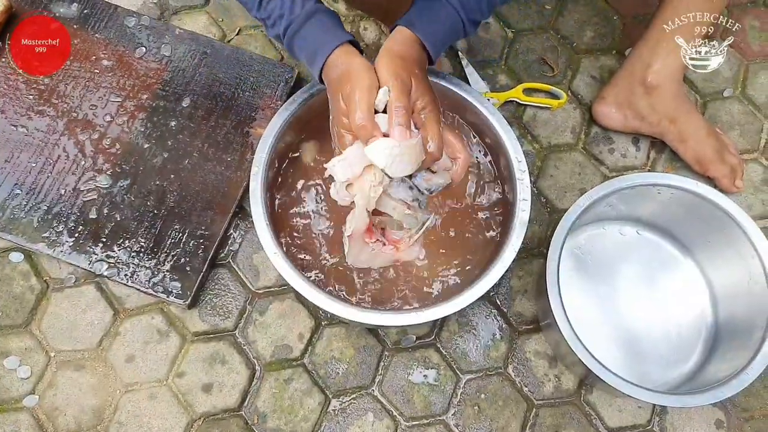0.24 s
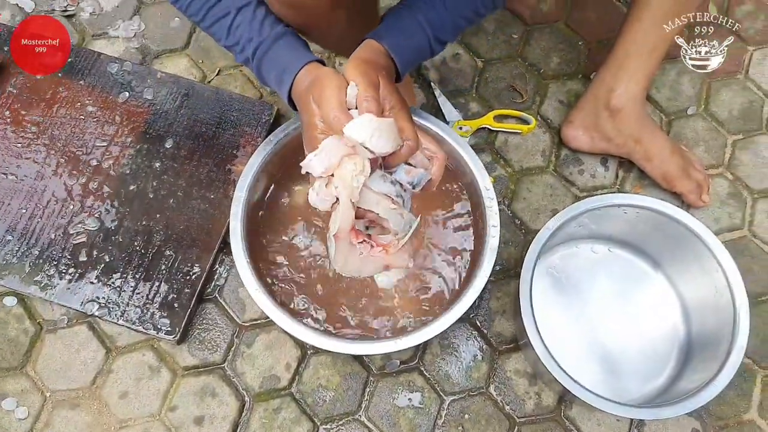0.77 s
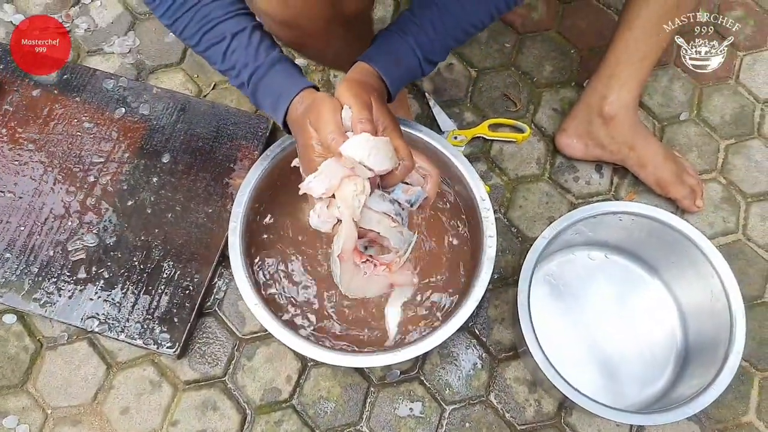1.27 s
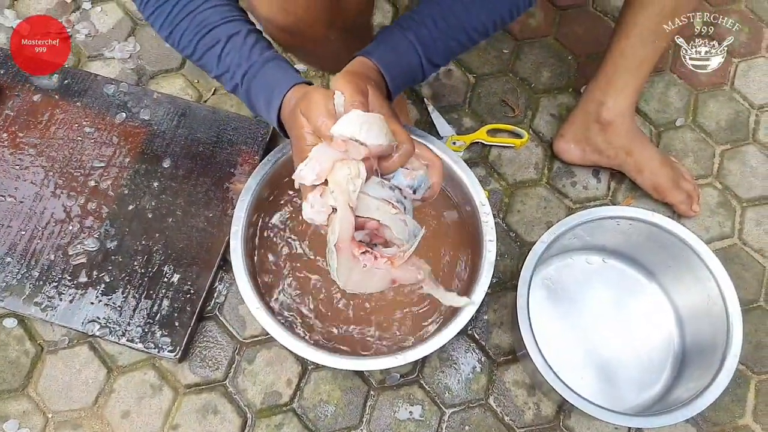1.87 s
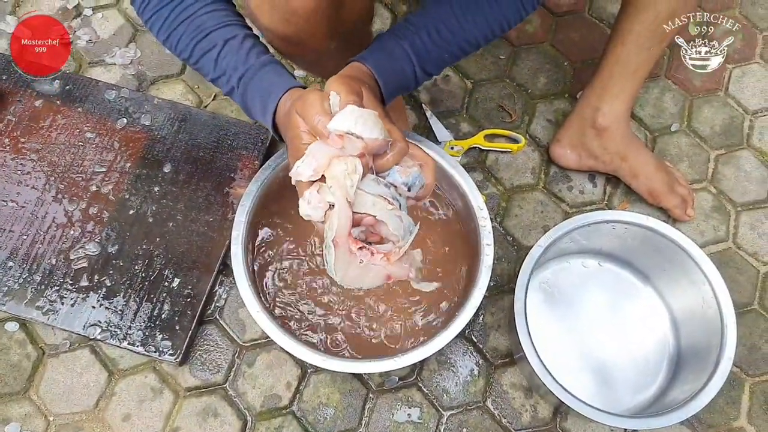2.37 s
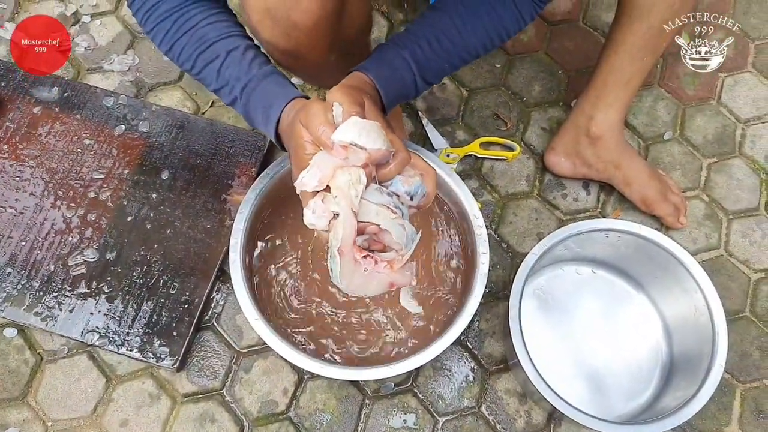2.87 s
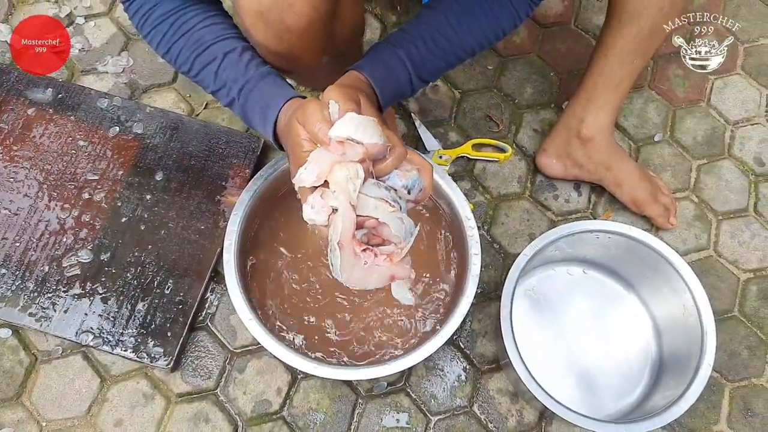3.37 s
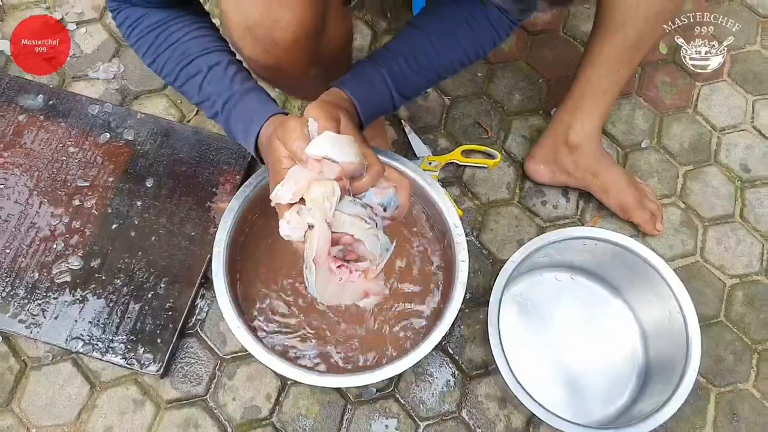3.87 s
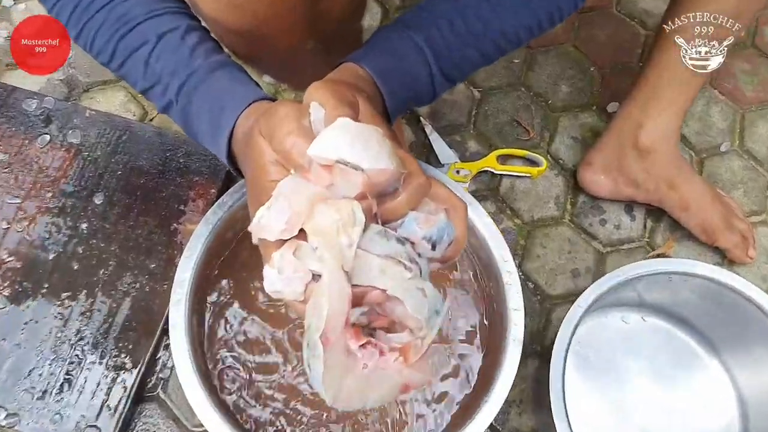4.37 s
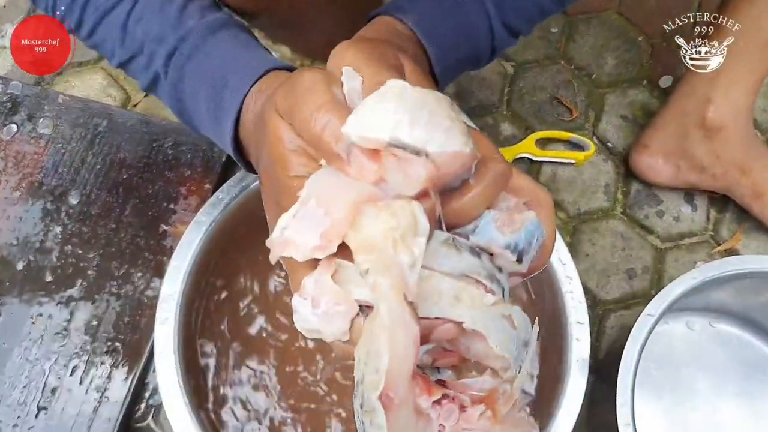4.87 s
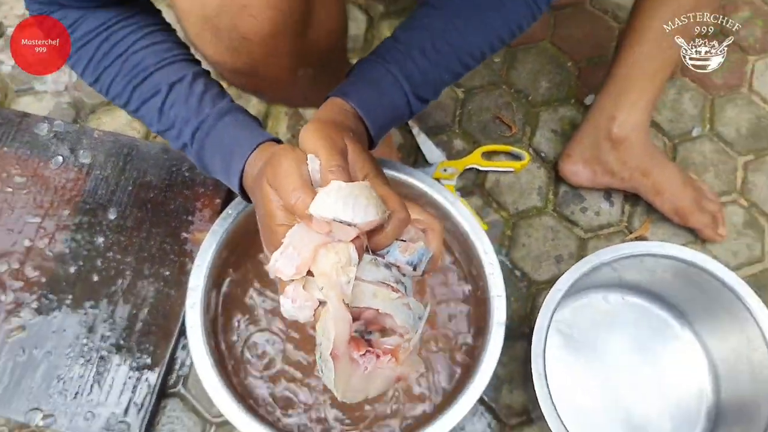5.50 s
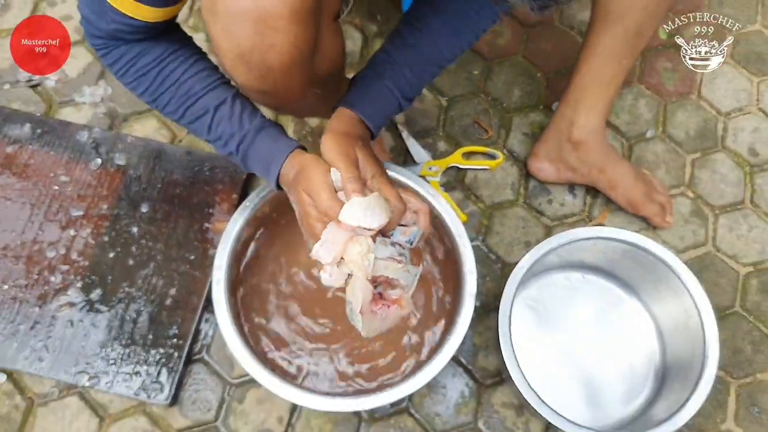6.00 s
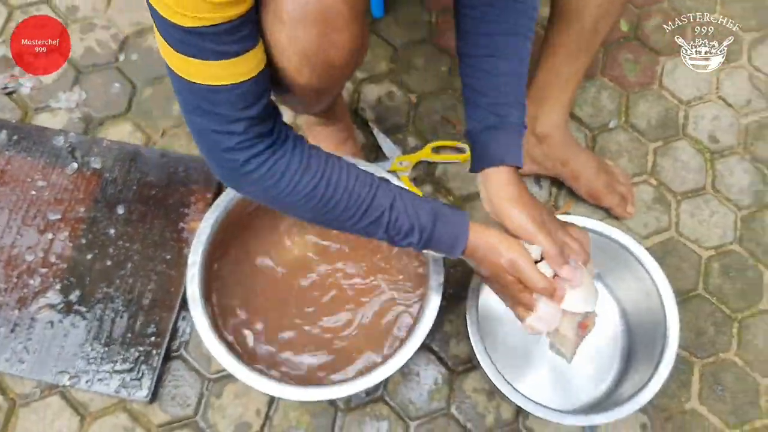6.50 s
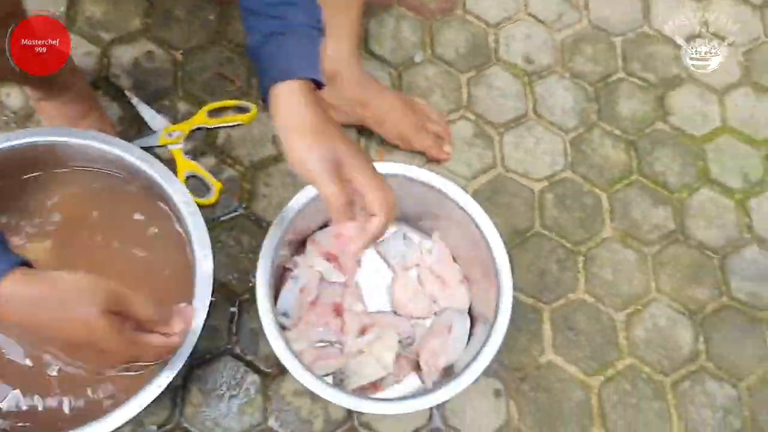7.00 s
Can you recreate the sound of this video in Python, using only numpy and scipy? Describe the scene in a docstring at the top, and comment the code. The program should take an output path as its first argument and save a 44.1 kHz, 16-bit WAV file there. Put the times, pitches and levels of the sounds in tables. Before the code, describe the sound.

Close up in a paved yard, wet fish drains over a bowl of water: a short gurgle, crackles, plinks and small smacks. A small bird soon begins steady rising chirps. Midway a rooster crows once, long and hoarse, while wind thumps the microphone. More drips follow, then wet pieces slap heavily into an empty steel bowl, which rings briefly.

```python
"""Wet pieces of fish, lifted from a bowl of water in a paved yard, drain through squeezing fingers.
From the start a trickle of bubbles and wet crackle thins to single plinks and smacks, over outdoor air and a trill.
After a second a small bird starts a steady chirp of rising whistles, while puffs of air buffet the microphone.
Midway a rooster crows once, long and hoarse; the strongest puffs of air strike during the crow and just after it.
At the end the pieces slap into an empty steel bowl and set its modes ringing."""
import sys
import numpy as np
from scipy import signal
from scipy.fft import rfft, irfft
from scipy.io import wavfile
from scipy.ndimage import uniform_filter1d, map_coordinates

SR = 44100
rng = np.random.default_rng(int(sys.argv[2]) if len(sys.argv) > 2 else 0)


def inscribe(sig):
    """Save sig as 16-bit PCM at rate SR to the path in sys.argv[1].

    A 1-D sig is mono; a 2-D sig holds one channel per row.
    Samples are clipped to [-1, 1] before scaling.
    """
    pcm = np.round(np.clip(np.atleast_2d(sig).T, -1, 1) * 32767)
    wavfile.write(sys.argv[1], SR, pcm.astype(np.int16))


N = 319725
TIME = np.arange(N) / SR


def from_db(db):
    """Decibels to gain."""
    return 10 ** (np.asarray(db) / 20)


def rms_one(x):
    """Scale to rms 1."""
    return x / np.sqrt(np.mean(x ** 2) + 1e-20)


def in_time(rows, t=TIME):
    """Read every column of a curve, drawn as straight lines, at the times t."""
    s, *columns = np.transpose(rows)
    return [np.interp(t, s, c) for c in columns]


def at_hz(points, hz):
    """Read a spectrum on a log-frequency axis."""
    f, value = np.transpose(points)
    return np.interp(np.log(np.maximum(hz, 1)), np.log(f), value)


def butter(x, hz, kind, order=2):
    """Causal Butterworth filter."""
    sos = signal.butter(order, np.clip(hz, 10, SR * .45), kind, fs=SR, output="sos")
    return signal.sosfilt(sos, x)


def colour(x, spectrum, size=2048):
    """Minimum-phase filter with the given spectrum: nothing sounds early."""
    gain = from_db(at_hz(spectrum, np.fft.rfftfreq(size, 1 / SR)))
    cepstrum = irfft(np.log(gain))
    cepstrum[1:size // 2] *= 2
    cepstrum[size // 2 + 1:] = 0
    impulse = irfft(np.exp(rfft(cepstrum)))
    return signal.oaconvolve(x, impulse)[:len(x)]


def drift(rate):
    """Smooth random curve of spread 1 that changes about rate times a second."""
    return rms_one(butter(rng.standard_normal(N + SR), rate, "low")[SR:])


def add(track, s, sound):
    """Mix a sound in at time s."""
    i = int(np.clip(s * SR, 0, N - 1))
    track[i:i + len(sound)] += sound[:N - i]


def dying(t, t60):
    """Exponential decay by 60 dB in t60 seconds."""
    return from_db(-60 * t / max(t60, 1e-3))


def grains(per_s, spread_db):
    """Random clicks of uneven size; rms 1."""
    size = from_db(spread_db * np.minimum(rng.exponential(1, N), 4)) * rng.choice([-1, 1], N)
    return rms_one(size * (rng.random(N) < per_s / SR))


# decay of the yard's echoes: (frequency [Hz], t60 [s])
ECHO_DECAY = [(200, 0.52), (800, 0.3), (1500, 0.3), (3000, 0.39), (6000, 0.2), (14000, 0.42)]


def yard(x, wet_db, direct_right, lag_s=0.00014, wander_s=0.0):
    """Direct sound plus scattered echoes, others for each port; the right port hears it by a wandering lag."""
    t, edges = TIME[:SR // 2], np.geomspace(100, 16000, 9)
    lag = lag_s + wander_s * drift(11)
    late = map_coordinates(x, [np.arange(N) - lag * SR], order=2)
    out = []
    for direct in (x, direct_right * late):
        tail = np.zeros(len(t))
        for lo, hi in zip(edges, edges[1:]):
            band = butter(rng.standard_normal(len(t)), [lo, hi], "band")
            tail += band * dying(t, at_hz(ECHO_DECAY, np.sqrt(lo * hi)))
        tail = tail * np.clip(t / 0.0022, 0, 1)
        echoes = signal.oaconvolve(x, tail / np.linalg.norm(tail))[:N]
        out.append(direct + from_db(wet_db) * echoes)
    return np.array(out)


def shade(pair, right_port):
    """The right microphone port sits in shadow, so its tone is filtered."""
    return np.array([pair[0], colour(pair[1], right_port)])


# tone of the outdoor hum and hiss: (frequency [Hz], relative level [dB])
AIR_COLOUR = [(15, -22), (25, -19), (86, 1.5), (165, -14.5), (291, -5.5), (437, -12), (1060, -20),
              (1360, -23), (1470, -19), (3050, -23), (3880, -20.5), (4690, -22.5), (6140, -30.5),
              (14600, -27.5), (15800, -43)]
# the breeze between the puffs: (time [s], relative level [dB])
BREEZE_LEVEL = [(0, -62.5), (2.4, -67), (3.3, -55), (4.0, -59), (4.75, -50.5), (5.75, -55), (6.6, -66.5)]


def air(hiss_db, breeze_db):
    """Distant hum and hiss of the outdoors, over a light breeze that comes in small random eddies."""
    hiss = rms_one(butter(colour(rng.standard_normal(N), AIR_COLOUR), 114, "high"))
    rumble = butter(rng.standard_normal(N), 61, "high", order=3)
    breeze = rms_one(butter(rumble, 79, "low", order=3))
    breeze_level_db = in_time(BREEZE_LEVEL)[0] + breeze_db + 6.0 * drift(7)
    return from_db(hiss_db) * hiss + from_db(breeze_level_db) * breeze


# the strongest puffs of air: (time [s], level of the low lump [dB], nominal length [s], microphone port)
AIR_PUFFS = [(0.601, -33, 0.025, "right"), (0.743, -27.5, 0.027, "right"), (1.559, -35.5, 0.04, "right"),
             (1.626, -33.5, 0.02, "right"), (1.791, -31, 0.024, "right"), (1.992, -38.5, 0.075, "right"),
             (2.642, -30, .025, "right"), (2.808, -31.5, 0.071, "left"), (2.892, -26.5, 0.034, "left"),
             (3.243, -32.5, 0.077, "left"), (4.226, -16, 0.035, "right"), (4.298, -14.5, 0.055, "right"),
             (4.385, -12, 0.021, "right"), (4.406, -3.5, 0.017, "right"), (4.588, -34, 0.037, "right"),
             (4.859, -30.5, 0.018, "left"), (4.918, -32.5, 0.043, "right"), (5.259, -32, 0.028, "left"),
             (5.382, -32.5, 0.089, "right"), (5.449, -24.5, 0.029, "right"), (5.688, -7, 0.042, "right"),
             (6.228, -28, 0.021, "left")]


def wind(port, bright_db, growth):
    """Eddies on one port swell and break off: a low lump, with turbulence that grows faster than the puff."""
    power = np.zeros(N)
    for s, db, length, side in AIR_PUFFS:
        if side == port:
            # slower to swell than to break off
            width = length * np.where(TIME < s, 1.3, .6)
            power += from_db(2 * db) * np.exp(-np.pi * ((TIME - s) / width) ** 2)
    force = np.sqrt(power)
    lump = butter(butter(rng.standard_normal(N), 67, "high"), 108.4, "low", order=3)
    lump = lump / np.sqrt(uniform_filter1d(lump ** 2, size=900))
    # (frequency [Hz], relative level [dB])
    rush = [(100, -16.5), (250, 3.0), (500, -2.5), (1000, -13.5), (2000, -21.5), (5000, -43.0), (15000, -59)]
    turbulence = rms_one(colour(rng.standard_normal(N), rush))
    turbulence = turbulence * from_db(bright_db) * (1 + growth * force)
    return butter(force * (lump + turbulence), 40.5, "high", order=4)


# swell of the trill: (time [s], relative level [dB])
INSECT_LEVEL = [(0, -68), (1.4, -77), (2.5, -73), (4.8, -49.5), (5.6, -64), (6.2, -64), (7.2, -93.5)]


def insect(level_db):
    """A faint, very high trill, a dozen strokes a second; every stroke falls in pitch."""
    stroke = np.cumsum(12 * (1 + .03 * drift(2))) / SR % 1
    pitch = 9600 * (1 + .2 * (.5 - stroke) + .003 * drift(300))   # Hz
    swell = np.sin(np.pi * stroke) ** 14
    tone = np.sin(2 * np.pi * np.cumsum(pitch) / SR)
    return tone * swell * from_db(in_time(INSECT_LEVEL)[0] + level_db)


# one chirp: (time after its start [s], pitch before the quiver [Hz], relative level [dB])
CHIRP_CURVE = [(0, 3550, -23), (.025, 4217, 1), (.05, 4400, -12.5), (.075, 4910, -7), (.1, 5060, -14)]
CHIRP_START_S, CHIRP_EVERY_S = 1.185, .3375   # a steady beat
CHIRP_DB, CHIRP_SWELL_DB_PER_S = -57, 1.7   # the bird grows louder as it goes on


def bird(buzz=0.032, count=17):
    """The same rising, slightly buzzy whistle about three times a second, a little off in pitch each time."""
    out, t = np.zeros(N), TIME[:int(CHIRP_CURVE[-1][0] * SR)]
    hz, shape_db = in_time(CHIRP_CURVE, t)
    quiver = 1 + buzz * drift(400)
    for k, change in enumerate(rng.normal(1, 0.0099, count)):
        since = k * CHIRP_EVERY_S
        pitch = hz * change * quiver[k * len(t):][:len(t)]
        whistle = np.sin(2 * np.pi * np.cumsum(pitch) / SR) * signal.windows.tukey(len(t), .1)
        level_db = CHIRP_DB + CHIRP_SWELL_DB_PER_S * since + shape_db
        add(out, CHIRP_START_S + since, from_db(level_db) * whistle)
    return out


# the crow, a short low note, then a long one that sags, breaks up and clears:
# (time [s], pitch before wavering [Hz], hoarseness [0-1], relative level [dB])
CROW_CURVE = [(3.17, 770, .5, -42.5), (3.24, 818, 0.17, -36), (3.43, 808.8, 0.3, -32),
              (3.5, 824, 0.56, -43), (3.59, 954, 0.23, -28.5), (3.82, 921, 0.06, -26.5),
              (4.1, 890.7, 0.67, -32.5), (4.64, 848.6, 1, -34), (4.9, 732.8, 0.1, -40.5),
              (4.99, 724, 0.02, -44.5), (5.08, 712, 0.16, -47), (5.28, 710, 0.19, -47),
              (5.44, 722, 0.88, -50), (5.56, 728, .55, -83)]
# throat resonances: (frequency [Hz], relative level [dB])
THROAT_COLOUR = [(400, -49.5), (620, -3), (780, -0.5), (1050, -10.5), (1250, 1.5), (1450, 0.5), (1650, 1.5),
                 (1850, 0.5), (2100, -1), (2500, -2), (3100, -16.5), (3700, -6.5), (4400, -51), (5300, -41),
                 (5950, -18), (6500, -37), (7200, -38), (12000, -69)]
SECOND_START_S, SECOND_LENGTH_S = 3.93, 0.595   # the other side of the syrinx joins in mid-crow
SECOND_HZ, SECOND_SAG_HZ_PER_S = 2525, 220   # pitch at its start, before wavering, and its fall


def rooster(level_db=-6.5, jitter=.05, rasp=2.72, second_db=-39, dulling=0.38):
    """Syrinx pulses through the throat, stumbling in pitch and strength when hoarse; a second voice joins."""
    hz, hoarse, effort_db = in_time(CROW_CURVE)
    waver = (.003 + .03 * hoarse) * drift(35)
    phase = 2 * np.pi * np.cumsum(hz * (1 + waver + jitter * hoarse * drift(164.5))) / SR
    sharpness = from_db(dulling * (effort_db - effort_db.max()))   # less effort, rounder pulses
    pulses = rms_one(sum(np.cos(k * phase) * (sharpness if k > 2 else 1) for k in range(1, 10)))
    turbulence = .6 * hoarse * rng.standard_normal(N)
    voice = colour(pulses * (1 + rasp * hoarse * drift(243)) + turbulence, THROAT_COLOUR)
    flutter = from_db(2.2 * drift(28))
    # level the voice, so that effort and flutter set its loudness
    voice = voice / np.sqrt(uniform_filter1d(voice ** 2, size=1500)) * flutter
    age = TIME - SECOND_START_S
    second_hz = (SECOND_HZ - SECOND_SAG_HZ_PER_S * age) * (1 + 0.01 * drift(67.6))
    swell = np.sqrt(np.abs(np.sin(np.pi * np.clip(age / SECOND_LENGTH_S, 0, 1))))
    second = np.sin(2 * np.pi * np.cumsum(second_hz) / SR) * swell * flutter * from_db(second_db)
    sounding = (TIME > CROW_CURVE[0][0]) & (TIME < CROW_CURVE[-1][0])
    return sounding * (voice * from_db(effort_db + level_db) + second)


def bubble_cloud(per_s, low_hz, high_hz, cycles, spread_db):
    """Bubbles born at random, each ringing a few cycles; busy stretches are evened to a level of about 1."""
    out = np.zeros(N)
    for place, pitch, size in rng.random((int(per_s * N / SR), 3)):
        hz = low_hz * (high_hz / low_hz) ** pitch
        t = TIME[:int(cycles * SR / hz) + 4]
        ring = np.sin(2 * np.pi * hz * t * (1 + 0.17 * t / t[-1]))   # climbs as it dies
        ring = ring * dying(t, t[-1]) * (1 - np.exp(-t * hz / 2))
        add(out, place * N / SR, from_db(spread_db * size ** 2) * ring)
    return out / np.sqrt(np.abs(uniform_filter1d(out ** 2, size=5000)) + 0.00092)


# run-off from the fish: (time [s], relative gurgle level [dB], relative wet crackle level [dB])
RUNOFF_LEVELS = [(0, -36.5, -59), (.16, -68.5, -65), (.4, -66.5, -58.5), (.58, -42, -49.5), (.72, -56, -57),
                 (1.03, -70, -58.5), (1.3, -51.5, -54), (1.47, -66, -62), (2.45, -77, -61),
                 (2.7, -50.5, -55), (3.55, -53, -59), (3.78, -52, -49), (4.1, -48.5, -59), (4.6, -50, -57),
                 (4.85, -45, -47), (4.97, -52, -62), (5.85, -71, -73), (6.1, -63.5, -61.5), (6.5, -88, -72)]


def trickle(gurgle_db=-4.0, wash_db=0.0, crackle_db=-2.0, spray_db=-0.5):
    """Run-off stirs bubbles and a wash in the bowl, while water films snap between fingers and fish."""
    gurgle, crackle = in_time(RUNOFF_LEVELS)
    stirred = bubble_cloud(per_s=170, low_hz=850, high_hz=3000, cycles=42, spread_db=24)
    snaps = bubble_cloud(per_s=520, low_hz=4000, high_hz=15800, cycles=24, spread_db=22)
    # the finest grains come in clumps, as the threads break and join
    clumps = rms_one(from_db(11.3 * np.minimum(drift(34.7), 1.7)))
    wash = rms_one(butter(colour(grains(2500, 1.3), SMACK_COLOUR), [600, 5000], "band"))
    spray = rms_one(butter(colour(grains(2500, 1.0), SMACK_COLOUR), 8200, "high"))
    in_bowl = stirred * from_db(gurgle_db) + clumps * wash * from_db(wash_db)
    on_hands = snaps * from_db(crackle_db) + clumps * spray * from_db(spray_db)
    return in_bowl * from_db(gurgle) + on_hands * from_db(crackle)


DRAIN_S = 2.6   # the stray drops thin out with this time constant as the fish drains


def stray_times(chance):
    """Times of the lesser drops: thickest when the fish is freshly lifted and where the wet crackle is strong."""
    flow = np.sqrt(from_db(in_time(RUNOFF_LEVELS)[1]))
    fallen = np.cumsum(flow * np.exp(-TIME / DRAIN_S))
    share = (np.arange(len(chance)) + chance) / len(chance)
    return np.interp(share, fallen / fallen[-1], TIME)


# fingers squeeze the wet flesh: (time [s], relative level [dB], rise [s], t60 [s])
SQUEEZES = [(0.0, -33, 0.00067, 0.13), (0.242, -30.5, 0.00085, 0.065), (0.251, -34, 0.0035, 0.14),
            (0.575, -38, 0.013, 0.23), (0.762, -27.5, 0.0092, 0.087), (3.657, -19, 0.013, 0.12),
            (3.68, -12, 0.0073, 0.06), (4.801, -33.5, 0.024, 0.34)]


def wet_flesh(squelch_db=0.0):
    """A squeeze of the hands bursts a dense froth."""
    squeeze, t = np.zeros(N), TIME[:SR // 2]
    for s, db, rise, t60 in SQUEEZES:
        add(squeeze, s, from_db(db + squelch_db) * (1 - np.exp(-t / rise)) * dying(t, t60))
    froth = rms_one(butter(colour(grains(5000, 0.77), SMACK_COLOUR), 770, "high"))
    return squeeze * froth


def bubble(hz, t60, rise, life=.31):
    """A trapped bubble rings, climbs ever faster in pitch as it nears the surface, and ends there."""
    t = TIME[:int(max(t60, .002) * life * SR)]
    age = t / t[-1]
    pitch = hz * (1 + rise * (0.297 * age + 1.1 * age ** 4))
    ring = np.sin(2 * np.pi * np.cumsum(pitch) / SR)
    return ring * dying(t, t60) * (1 - np.exp(-t / 0.00028)) * (1 - age ** 8)


# the loudest drops smacking on the water: (time [s], relative peak level [dB], relative treble [dB])
SMACKS = [(0.4878, -23, 17), (0.5387, -27.5, -2), (0.5871, -29, -8.5), (0.7248, -24, 1.5),
          (0.8485, -27, -6), (1.1553, -32, -8), (1.2989, -29.5, -28), (2.0203, -30.5, -8),
          (2.0617, -31, -32), (2.1799, -29, 34), (2.5995, -29.5, -11), (2.7397, -27.5, -4),
          (2.7726, -26.5, -14), (2.8579, -21.5, 0), (2.9262, -29.5, -6), (2.9532, -28, -4),
          (3.1697, -30.5, -12), (3.2345, -31.5, 16), (3.6885, -12.5, -31), (5.5687, -36, -7.5),
          (5.6955, -29.5, -10), (6.2228, -33.5, 13), (6.2751, -34.5, 5)]
# tone of water hitting water: (frequency [Hz], relative level [dB])
SMACK_COLOUR = [(400, -13), (700, -5.5), (1000, -11), (1400, 6.5), (2200, -6.5), (4000, -5.5), (5600, -1),
                (7300, -19.5), (9000, -8), (12500, -16.5), (15500, -12)]


def splats(level_db=0.5, t60=0.015, fizz_db=-9, stray_db=-41, spread_db=9, stray_treble_db=-10, count=36, size=4):
    """Each impact is a soft crack and a few tiny bubbles that burst within milliseconds."""
    out, t = np.zeros(N), TIME[:SR // 30]
    when, strength = rng.random((count, 2)).T
    strays = zip(stray_times(when), stray_db + spread_db * strength, np.full(count, stray_treble_db))
    for s, db, treble_db in [*SMACKS, *strays]:
        burst = rng.standard_normal(len(t)) * dying(t, t60) * (1 - np.exp(-t / .0012))
        body = butter(burst, 7000, "low", order=4)
        treble = butter(burst, 7500, "high", order=4)
        crack = colour(body + from_db(treble_db + 10.0) * treble, SMACK_COLOUR)
        add(out, s, from_db(db + level_db) * crack / np.abs(crack).max())
        for delay, pitch in rng.random((size, 2)):
            hz = 3500 * 4 ** pitch
            # after a dull smack the higher bubbles are fainter
            bubble_db = db + fizz_db + pitch * min(treble_db, 0)
            add(out, s + 0.016 * delay, from_db(bubble_db) * bubble(hz, 25 / hz, 0.018))
    return out


# the loudest drops that trap a bubble:
# (time [s], nominal pitch [Hz], relative level [dB], strength of the climb in pitch [factor])
PLINKS = [(0.024, 1445, -31, 0.6), (0.245, 5650, -24, .1), (0.254, 1276, -40, 0.15),
          (0.358, 1850, -39.5, 0.49), (0.423, 1970, -33.5, 0.4), (0.514, 1700, -35.5, 0.18),
          (0.658, 1545, -39, 0.21), (0.726, 2320, -36.5, 0.74), (0.886, 3540, -29.5, 0.9),
          (1.08, 1373, -37.5, 0.21), (1.195, 2220, -37.5, 0.61), (1.3, 1108, -36.5, 0.61),
          (1.335, 825, -39, 1.1), (1.357, 1153, -39.5, 0.81), (1.397, 4730, -32, 0.089),
          (1.731, 1420, -39, 0.18), (2.084, 1900, -35, 1.65), (2.207, 1625, -38.5, 0.43),
          (2.26, 1940, -40.5, 0.6), (2.363, 1366, -41, 0.084), (2.563, 953, -35.5, 0.26),
          (2.617, 2160, -32.5, 0.32), (2.706, 2390, -31.5, 0.55), (2.742, 1720, -31, 1.7),
          (2.868, 2170, -32, 0.15), (2.896, 3150, -35.5, 0.11), (2.963, 2260, -38.5, 0.73),
          (3.067, 990, -44, 0.34), (3.145, 950, -42.5, 0.44), (4.599, 838, -29, 0.32),
          (5.128, 1000, -29, 0.81), (5.569, 3080, -38, 0.26), (5.626, 1250, -34.5, 0.35),
          (5.96, 1580, -46, 0.15), (6.026, 715, -42.5, 0.61), (6.357, 1128, -49.5, 0.11)]
BUBBLE_T60_S, BUBBLE_T60_SLOPE = .135, 1.28   # t60 at a nominal 1 kHz; it shrinks by this power of pitch


def drips(level_db=4.0, stray_db=-47, spread_db=6, stray_climb=0.435, low_hz=1400, high_hz=5500, count=70):
    """Single plinks, a few loud among many faint; big low bubbles ring longest."""
    out = np.zeros(N)
    when, pitch, size, climb = rng.random((count, 4)).T
    stray_hz = low_hz * (high_hz / low_hz) ** pitch
    strays = zip(stray_times(when), stray_hz, stray_db + spread_db * size, 2 * stray_climb * climb)
    for s, hz, db, rise in [*PLINKS, *strays]:
        t60 = BUBBLE_T60_S * (1000 / hz) ** BUBBLE_T60_SLOPE
        add(out, s, from_db(db + level_db) * bubble(hz * .97, t60, rise))
    return out


# fish landing in the empty bowl: (time [s], relative slap level [dB], slap t60 [s],
# relative bowl ring level [dB], slap low cut [Hz], top cut of slap and ring [Hz])
FISH_LANDINGS = [(6.844, -31.5, 0.56, -49, 1090, 11800), (6.872, -42, 0.036, -28.5, 282, 610),
                 (6.889, -28.5, 0.53, -49, 1000, 7800), (6.932, -19, 0.44, -25.5, 300, 11600),
                 (6.953, -5.5, 0.067, -19.5, 120, 11300), (7.025, -9.5, 0.076, -22, 500, 11900),
                 (7.038, -16.5, 0.18, -23, 130, 6000), (7.094, -4.5, 0.055, -39, 1100, 1930),
                 (7.165, -22, 0.014, -68, 1700, 3000)]
# tone of wet flesh on steel: (frequency [Hz], relative level [dB])
WET_SLAP_COLOUR = [(90, -6), (160, -0.5), (300, 0), (600, -5.5), (1200, 2.5), (1800, 5), (2400, -6),
                   (3200, -0.5), (5000, 0), (7000, -7), (10000, -7.5), (15500, -1)]
# modes of the empty steel bowl: (frequency before detuning [Hz], relative level [dB], t60 [s])
BOWL_MODES = [(162.5, -10, 0.24), (278.5, -18.5, 1), (316, -5, 0.17), (348, -4.5, 0.15), (365.3, 2.5, 0.17),
              (439, 2, 0.17), (770, -13, 0.37), (900, -1, 0.3), (1145, -1.5, 0.21), (1128, 0, 0.22),
              (1233, 7, 0.11), (1370, -9, 0.11), (1630, -25, 0.33), (1554, -9, 0.34), (1726, -13, 0.65),
              (1790, -24, 0.38), (2060, -5, 0.37), (2695, -3.5, 0.1), (3150, -11, 0.16), (3650, -21, 0.15),
              (4320, -4, 0.25), (5580, -1, 0.21)]


def landing(slap_db=-1.5, ring_db=-6.5, clatter_db=-15, clatter_t60=0.18):
    """Wet slaps on the steel floor of the bowl; each sets its modes ringing, detuned by the shifting load."""
    slaps, rings, t = np.zeros(N), np.zeros(N), TIME[:SR // 2]
    wet = rms_one(colour(grains(9000, 2.7), WET_SLAP_COLOUR))
    for k, (s, db, t60, bowl_db, low_hz, top_hz) in enumerate(FISH_LANDINGS):
        # the thin wall's many high modes blur into a short clatter after the slap
        decay = dying(t, t60) + from_db(clatter_db) * dying(t, clatter_t60)
        slap = wet[k * SR // 3:][:len(t)] * decay * (1 - np.exp(-t / 0.00017))
        slap = butter(butter(slap, top_hz, "low"), low_hz, "high", order=1)
        add(slaps, s, from_db(db + slap_db) * slap)
        strengths = from_db(rng.normal(0, 2.8, len(BOWL_MODES))) * rng.choice([-1, 1], len(BOWL_MODES))
        loads = rng.normal(1, .006, len(BOWL_MODES))
        modes = np.zeros(len(t))
        for strength, load, (hz, level, life) in zip(strengths, loads, BOWL_MODES):
            modes += strength * from_db(level) * np.sin(2 * np.pi * hz * load * t) * dying(t, life)
        ring = butter(modes * (1 - np.exp(-t / 0.0024)), top_hz, "low")
        add(rings, s, from_db(bowl_db + ring_db) * ring)
    return slaps + rings


# right port, facing away from the water: (frequency [Hz], relative level [dB])
RIGHT_SHADOW = [(100, 7.5), (600, -0.5), (1300, -11.5), (2400, -16.5), (4400, -20.5), (6000, -37),
                (8500, -18), (12000, -41), (15500, -5)]
# right port as the empty bowl reaches it: (frequency [Hz], relative level [dB])
RIGHT_SHADOW_BOWL = [(100, 2.5), (400, -1), (1300, -2), (3200, -1), (4500, -4.5), (6000, -16), (8500, -38),
                     (12000, -8), (15500, -15)]


def scene():
    """Water and animals lie to the left, the empty bowl near the middle."""
    water = drips() + splats() + trickle() + wet_flesh()
    near = yard(water + insect(level_db=-2.0), wet_db=-10.0, direct_right=0.75, lag_s=0.0001, wander_s=7e-5)
    crow = yard(rooster(), wet_db=1.0, direct_right=0.2, lag_s=0.00012)
    chirps = yard(bird(), wet_db=1.5, direct_right=0.59)
    bowl = yard(landing(), wet_db=-10.5, direct_right=0.88, lag_s=0, wander_s=3e-5)
    left = wind("left", bright_db=-45, growth=3.0) + air(hiss_db=-65, breeze_db=5.5)
    right = wind("right", bright_db=-16.0, growth=4.27) + air(hiss_db=-64.5, breeze_db=3.0)
    yard_sounds = shade(near + crow + chirps, RIGHT_SHADOW)
    return yard_sounds + shade(bowl, RIGHT_SHADOW_BOWL) + np.array([left, right])


CUTOFF_HZ = 15900


def record(dry):
    """The strongest peaks are rounded and the top is cut."""
    rounded = .82 * np.tanh(dry / .82)
    return signal.sosfilt(signal.ellip(10, .1, 80, CUTOFF_HZ, fs=SR, output="sos"), rounded)


dry = scene()
out = record(dry)
inscribe(out)
```